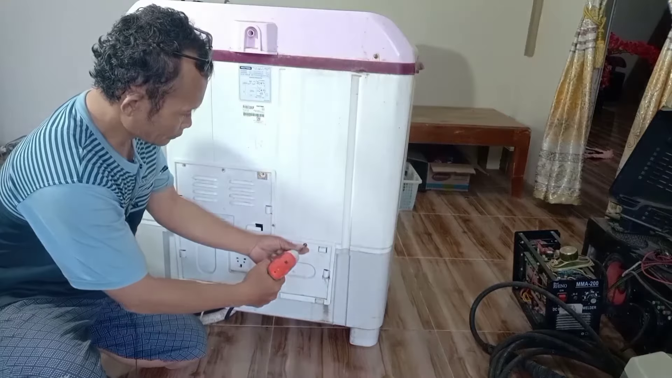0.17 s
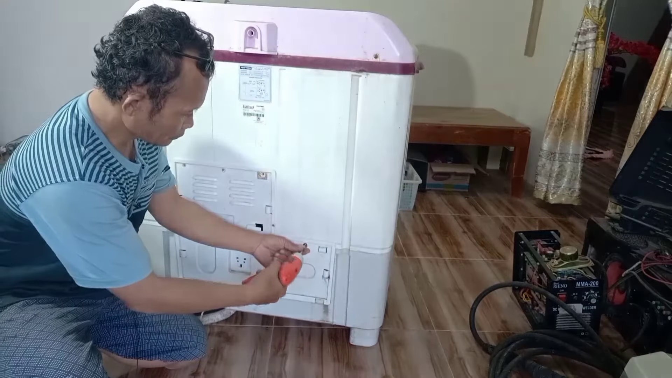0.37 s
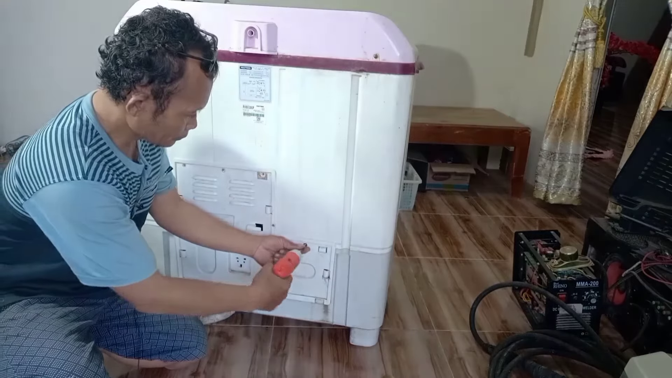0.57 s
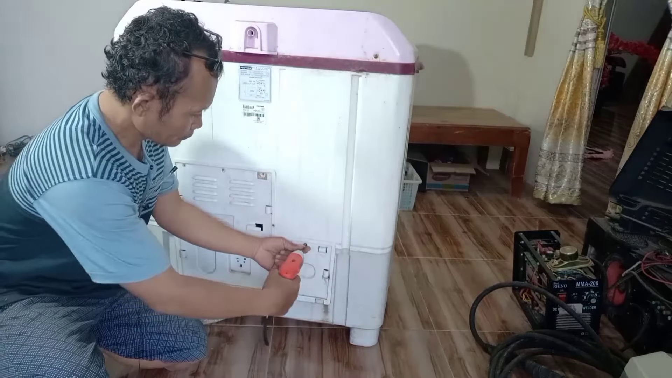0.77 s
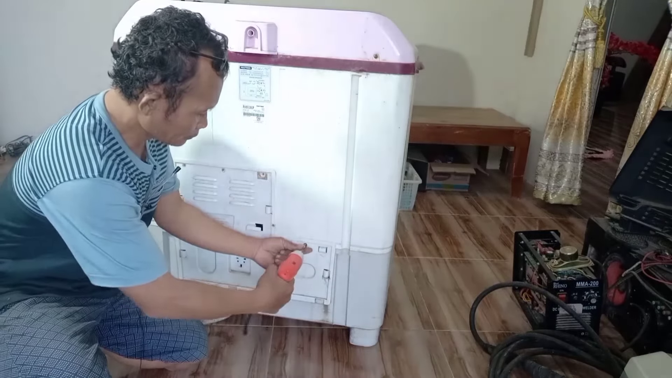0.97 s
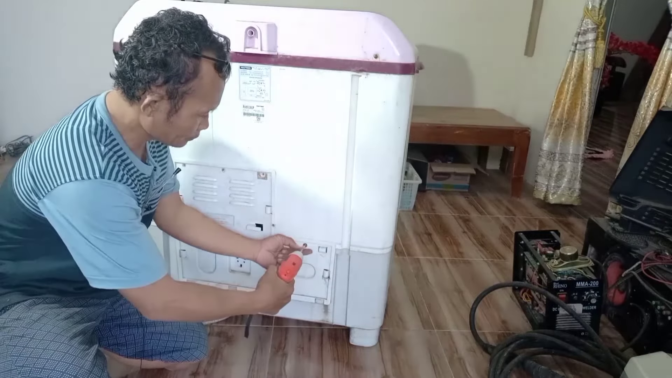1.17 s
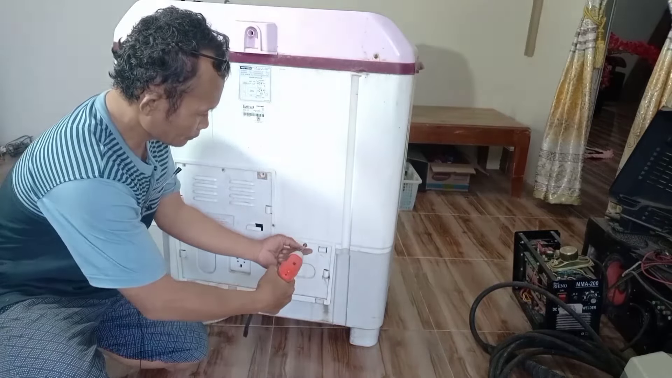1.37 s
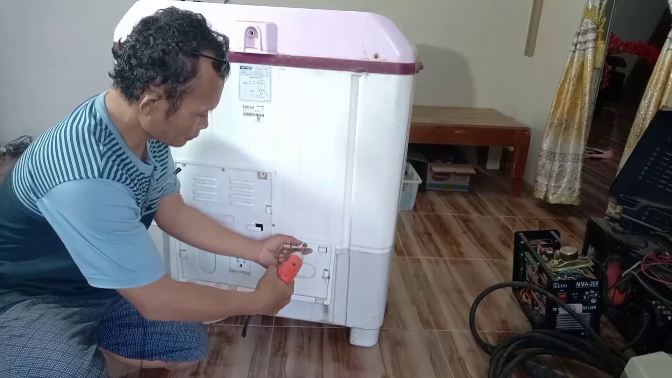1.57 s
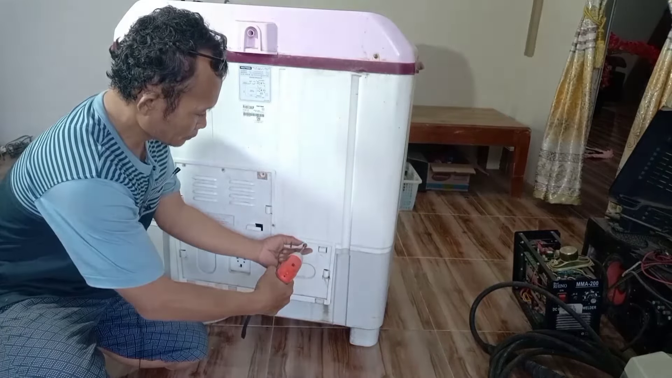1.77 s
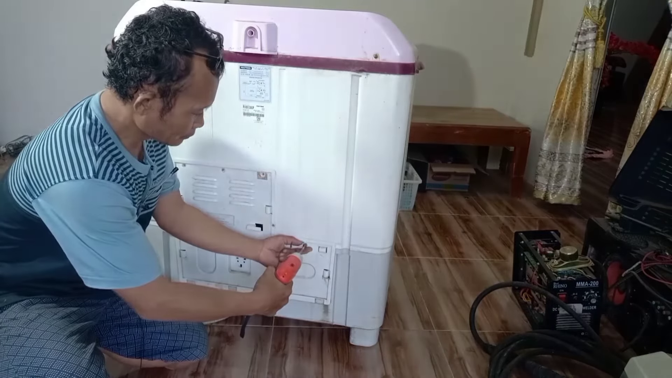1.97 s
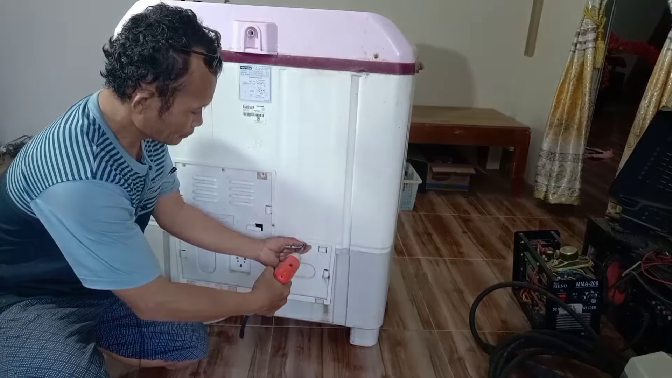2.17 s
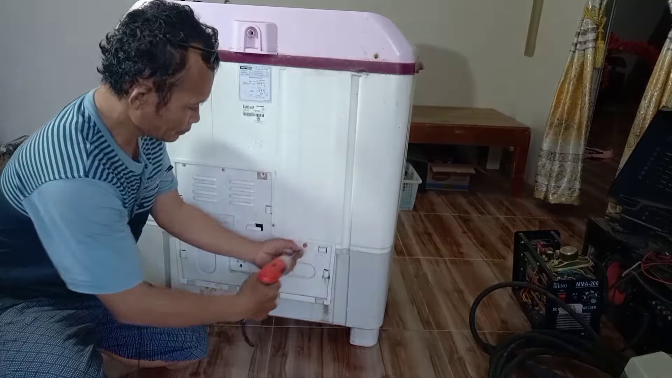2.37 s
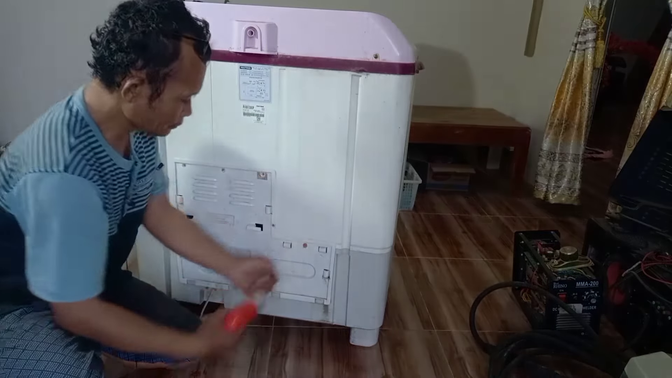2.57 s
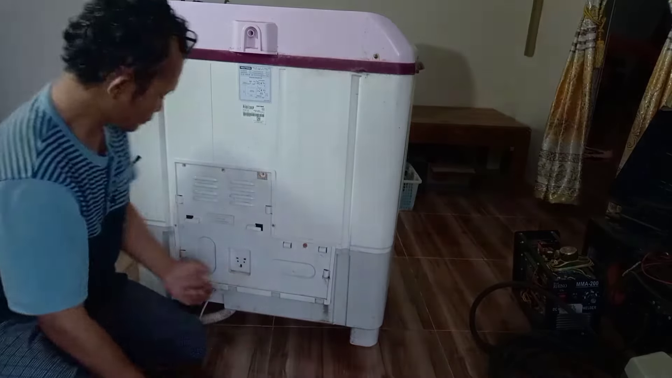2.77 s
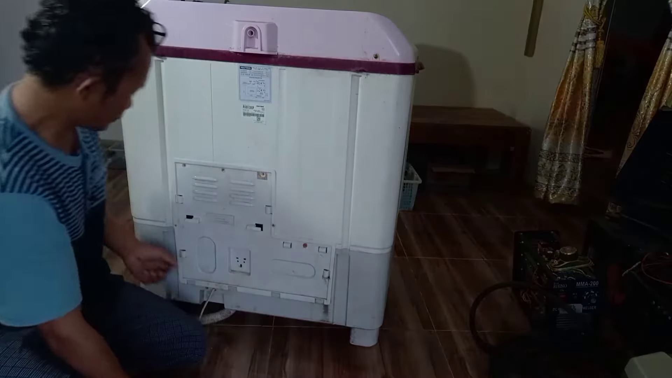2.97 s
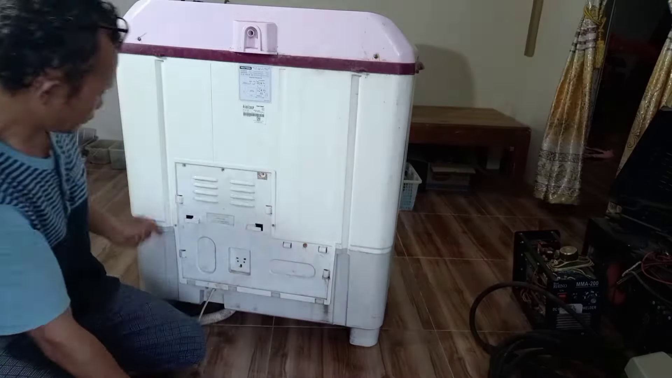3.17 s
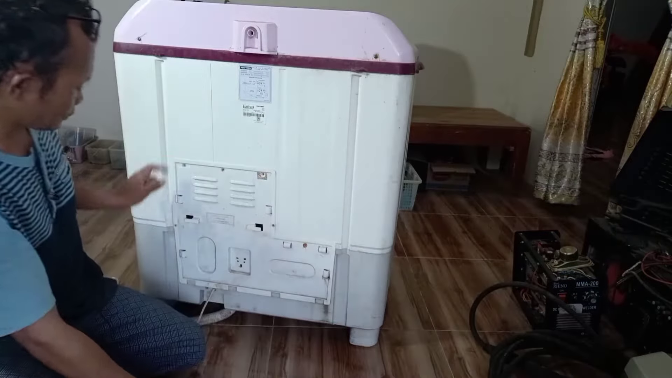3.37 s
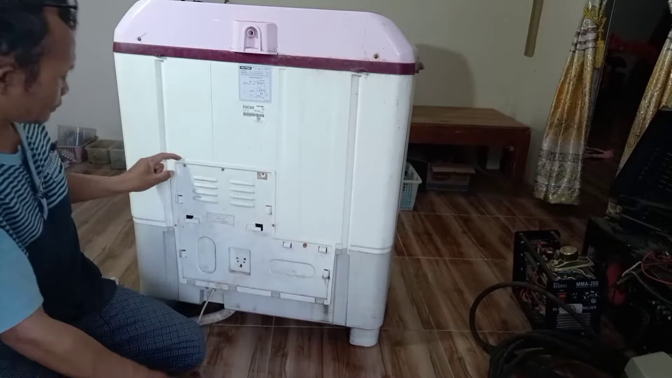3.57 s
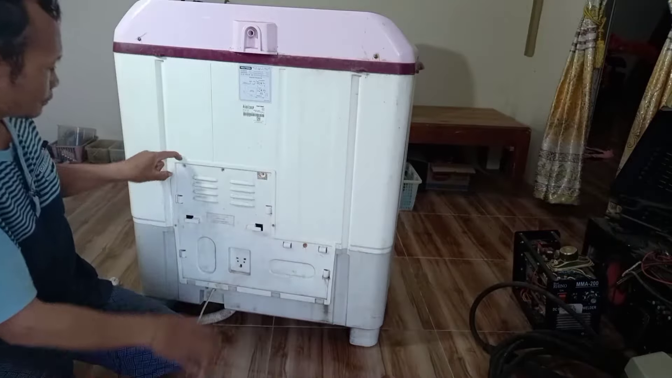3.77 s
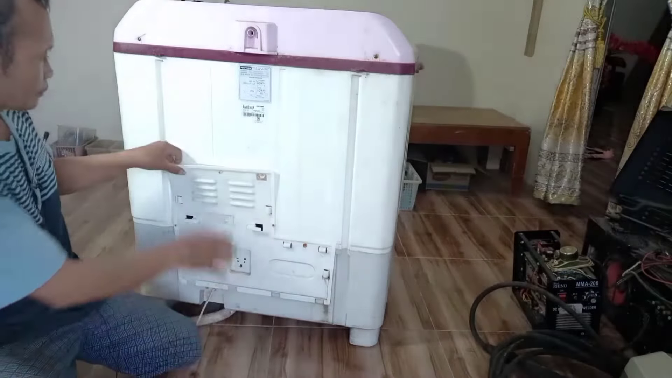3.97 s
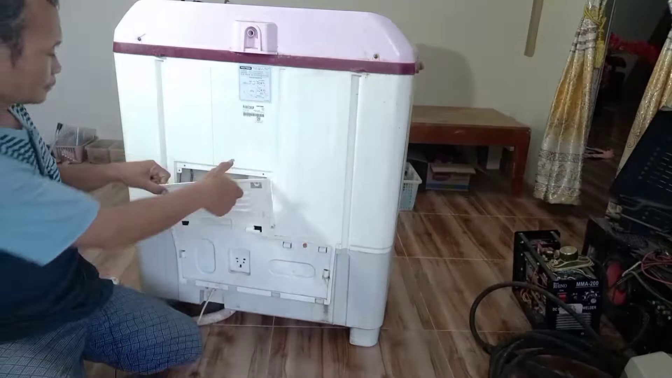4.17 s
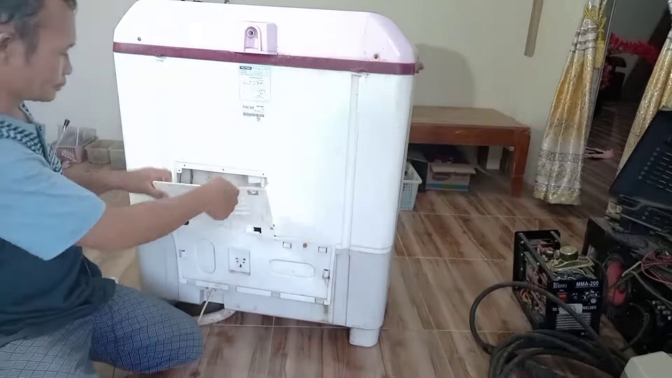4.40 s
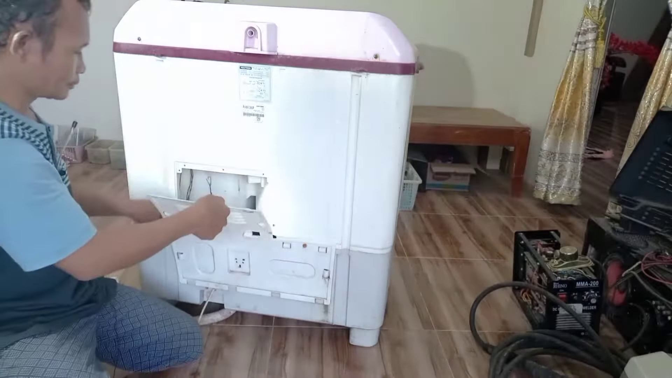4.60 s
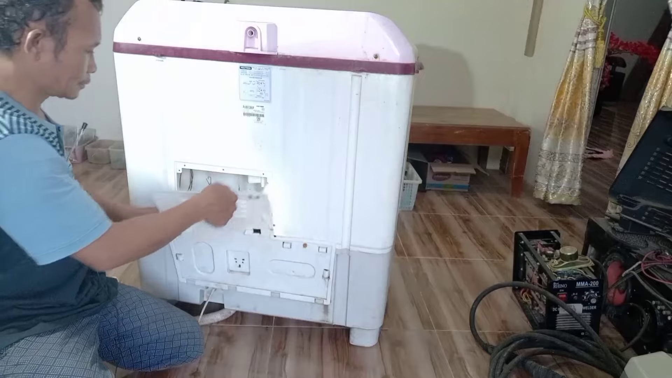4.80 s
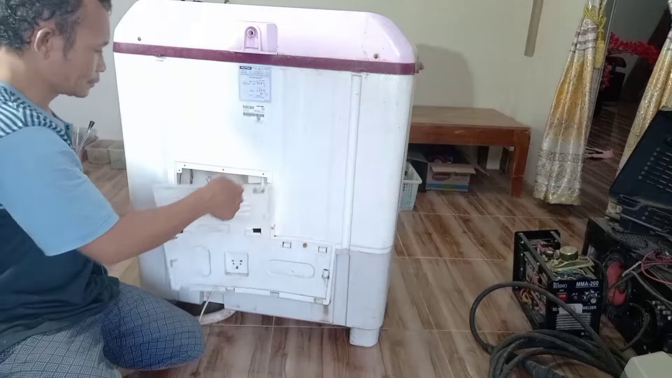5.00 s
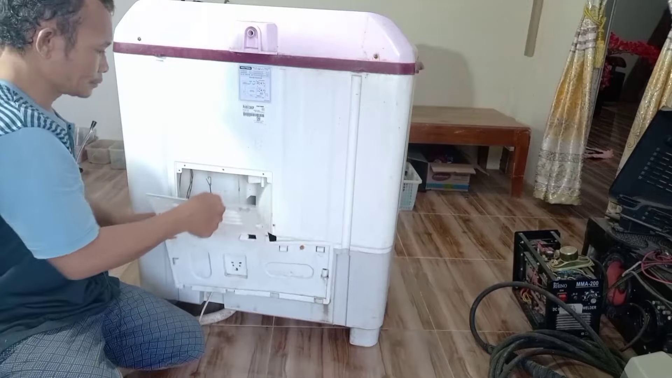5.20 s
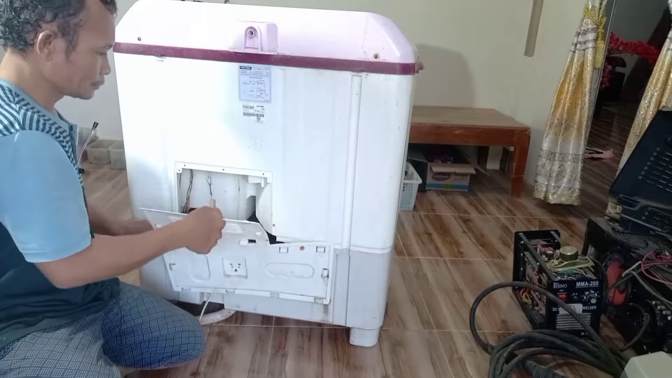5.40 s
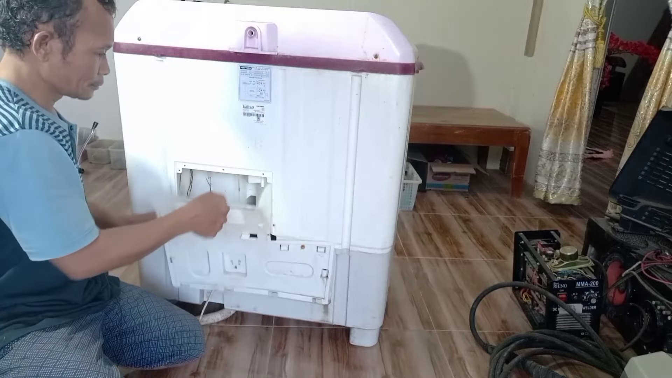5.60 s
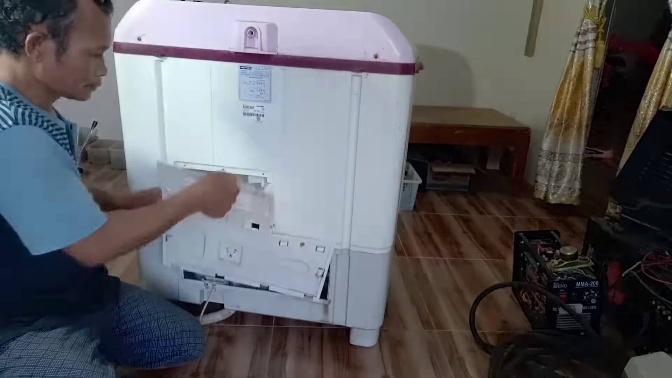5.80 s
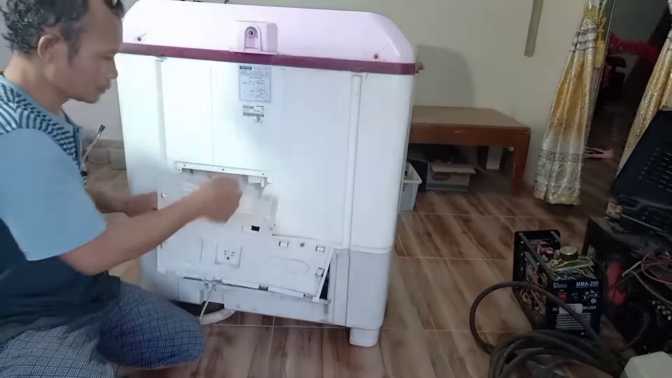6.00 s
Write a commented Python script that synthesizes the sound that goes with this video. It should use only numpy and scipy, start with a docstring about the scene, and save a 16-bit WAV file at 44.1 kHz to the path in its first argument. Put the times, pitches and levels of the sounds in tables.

```python
"""A tiled room, at the back of a washing machine. A small cordless screwdriver spins a screw out:
the rotor hums, the gears whine and rattle, the brushes scratch. It speeds up as the screw frees, then
coasts to a stop. The plastic back panel is pried off: it grinds and squeaks in its slot, its tabs snap
loose and it knocks against the hollow cabinet. Underneath lies a bed of low rumble, a distant motor's
drone, soft hiss and a faint electronic buzz."""
import sys
import numpy as np
from scipy import signal
from scipy.fft import rfft, irfft, next_fast_len
from scipy.io import wavfile
from scipy.ndimage import map_coordinates

SR = 44100
rng = np.random.default_rng(int(sys.argv[2]) if len(sys.argv) > 2 else 0)


def digitize_waveform(pressure):
    """Quantize a signal to 16-bit integers and store it at the path in sys.argv[1].

    Rows of a 2-D input are taken as channels; values are limited to [-1, 1].
    """
    field = np.atleast_2d(pressure).T
    bounded = np.clip(field, -1, 1)
    quanta = np.round(bounded * 32767).astype(np.int16)
    wavfile.write(sys.argv[1], SR, quanta)


N = 266672

# Table levels are relative, set before the mix.
# unbalance of the rotor and planet wheels: multiple of shaft speed, level/dB
UNBALANCE = [(.59, -4.5), (1, -1.5), (1.181, -7.5), (1.8, -14), (2, -14), (2.391, -11.5)]
# three rotor poles and the commutator's thin overtones: multiple of shaft speed, level/dB
POLE_TONES = [(3, 3.5), (4, -11), (22, -18), (40, -4), (41, -5)]
# tooth mesh and its overtones: multiple of shaft speed, level/dB
TOOTH_TONES = [(4.7, -12), (5.375, -3), (5.65, -10), (6.35, -12), (8.35, -9), (9, -10), (10.75, -1),
               (16.125, 0), (18.8, -3), (21.5, -2), (26.875, -2)]
# resonances of the gear housing: f/Hz, width/Hz, level/dB
HOUSING_PEAKS = [(930, 80, -2), (1140, 150, 2), (2150, 330, -2), (2620, 280, -2), (3750, 150, -6),
                 (4120, 240, -7), (4660, 260, -3)]
# colour of the gear rattle: f/Hz, level/dB
RATTLE_EQ = [(59, -53), (100, -16), (152, -15), (201, 1), (290, -11), (410, -10), (724, -4.5), (1010, -8.5),
             (1150, -13.5), (1710, -4.5), (2520, -3), (2970, -8.5), (4620, -9.5), (7040, -9.5),
             (8000, -15.5), (10400, -55), (17600, -120)]
# colour of the brush scratch: f/Hz, level/dB
BRUSH_EQ = [(4800, -31.5), (5400, -5.5), (5800, -25.5), (7500, -12), (8250, -3), (8750, -12.5), (9450, -2),
            (10100, -3.5), (11000, 0), (12600, -5.5), (14000, -13.5), (15500, -22)]
# the panel knocks and its tabs snap: t/s, knock level/dB, clack over knock/dB, snap over knock/dB
PANEL_HITS = [(.54, -30.5, -4.5, -7), (3.332, -44.5, -1.5, 4), (4.103, -22, -16, -13),
              (4.113, -24.5, -20, -13), (4.226, -18, -16, -17.5), (4.308, -16.5, -11.5, -19.5),
              (4.775, -12, -10.5, -17.5), (5.026, -23, -18, -18.5), (5.068, -13, -3, -9.5),
              (5.235, -33, -13, -25), (5.351, -12.5, -2.5, -4), (5.983, -24.5, 2, 6)]
# soft thuds: one right at the start, the rest where hands and tool bump the cabinet: t/s, thud level/dB
SOFT_BUMPS = [(.03, -32), (.552, -27.5), (.764, -37), (3.154, -41.5), (3.373, -33), (3.694, -41.5),
              (5.825, -33.5)]
# the bit and the loose screw click: t/s, snap level/dB
SCREW_CLICKS = [(1.034, -47), (1.068, -43), (2.85, -46.5), (2.926, -28.5), (2.991, -39)]
# ring of the hollow cabinet and its panel: f/Hz, level/dB, t60/s
CABINET_MODES = [(107.5, 3.5, 0.29), (158.2, 3, 0.21), (287, -4.5, 0.15), (378.6, -0.5, 0.2),
                 (480, 2.5, 0.29), (600, -10, 0.17), (711, 5, 0.096), (900.6, 5.5, 0.17),
                 (1260, -2.5, 0.48), (1700, -12, 0.48), (2025, 6.5, 0.21), (2260, 7, 0.17),
                 (2460, -1, 0.33), (3166, 22.5, 0.046), (7370, 1, 0.17)]
# colour of the struck plastic: f/Hz, level/dB
PLASTIC_EQ = [(35, -39), (60, -14), (96, 0), (156, 2), (259, 6), (475, -5.5), (673, -2.5), (773, -8.5),
              (869, -10), (1450, -13), (2470, -11.5), (3270, -22.5), (8280, -28.5), (11200, -24),
              (15500, -38)]
# the panel grinds in its slot just before it gives: t/s, length/s, level/dB
PANEL_GRINDS = [(4.223, 0.0072, -23), (4.286, 0.0293, -24), (4.758, 0.0153, -21.5), (5.327, 0.063, -41)]
# hands and panel slide over the plastic: t/s, length/s, level/dB
SLIDES = [(3.33, 0.22, -59), (4.09, 0.089, -60), (5.002, 0.031, -52), (5.805, .025, -54.5)]
# colour of a slide: f/Hz, level/dB
SLIDE_EQ = [(300, -23), (1500, -1), (5500, -6), (11500, 1), (15000, -12)]
# partials of a distant motor: f/Hz, level/dB
DRONE_TONES = [(82, 0.5), (126, 3), (222, -10.5)]
# swell of that motor's drone: t/s, level/dB
DRONE_RIDE = [(0, -41.5), (.9, -52), (3.15, -55), (3.45, -43), (3.9, -53.5), (4.55, -49), (6.05, -48.5)]
# colour of the room's rumble: f/Hz, level/dB
RUMBLE_EQ = [(15, -48), (25, -18), (49, -17.5), (70, -4.5), (118, -2.5), (188, -7), (227, -2.5),
             (264, -11.5), (356, -15.5), (436, -21), (500, -18), (650, -52), (1100, -120)]
# colour of the room's hiss: f/Hz, level/dB
HISS_EQ = [(180, -37), (300, -1.5), (420, -7.5), (600, -4), (900, -7.5), (1650, -14.5), (2400, -15),
           (3600, -21), (4600, -22.5), (5100, -19.5), (5900, -23), (11500, -21.5), (15500, -25.5)]
# faint electronic buzz: harmonic number, level/dB
BUZZ_TONES = [(2, 8), (3, 8), (4, 7), (5, 4.5), (8, 4), (9, 7.5), (10, 8), (11, 8), (12, -14)]

# tool layers: level running free/dB, boost at full load/dB, boost per doubling of spin/dB
HUM_LAW, POLE_LAW, BRUSH_LAW = (-48.5, 10, 2), (-44, 6, 14), (-35, 8.5, 5.3)
RATTLE_LAW, MESH_LAW = (-41.5, 11.8, 1.5), (-45, 13.5, 2)
ON_S, FREE_S, OFF_S = 1.088, 2.088, 2.465  # trigger pressed, screw free, trigger released
ATTACK_S = .016
TIME = np.arange(N) / SR


def screwdriver(free_hz=307.5, drag_hz=85.5, stop_s=.62, jolt_db=4, jolt_s=.045):
    """One shaft drives rotor, gears and brushes; the pitch climbs as the screw's drag eases."""
    load, spin, coasting_s = motion()
    shaft_hz = (free_hz - drag_hz * load) * spin
    angle = phase(shaft_hz * (1 + .00294 * wobble(40.35)))
    # Backlash lets the gears run less evenly than the rotor.
    gear_angle = angle + phase(shaft_hz * .00645 * wobble(160))
    dull_db = 4 * coasting_s  # per multiple of shaft speed: high overtones die first
    motor = rotor(angle, shaft_hz, load, spin, dull_db)
    gearbox = gears(gear_angle, shaft_hz, load, spin, dull_db)
    scratch = level(BRUSH_LAW, load, spin) * brushes(angle, gear_angle)
    # The slack gears jolt at release; with the current off, gears and brushes fade.
    release = amp(jolt_db * np.exp(-((TIME - OFF_S) / jolt_s) ** 2) - 24 * coasting_s)
    running = gate(ON_S, N / SR, ATTACK_S) * np.clip(1 - (coasting_s / stop_s) ** 2, 0, 1)
    return running * (motor + release * (gearbox + scratch))


def motion(start_lag=.35, spin_up_s=.079, coast_s=.42):
    """The screw's drag eases evenly; the motor spins up, then coasts down after release."""
    load = np.clip((FREE_S - TIME) / (FREE_S - ON_S), 0, 1)
    coasting_s = np.maximum(TIME - OFF_S, 0)
    spin_up = 1 - start_lag * np.exp(-np.maximum(TIME - ON_S, -ATTACK_S) / spin_up_s)
    return load, spin_up * np.exp(-coasting_s / coast_s), coasting_s


def level(law, load, spin):
    """Gain of one tool layer from its load and spin."""
    free_db, load_db, spin_db = law
    return amp(free_db + load_db * load + spin_db * np.log2(spin))


def rotor(angle, shaft_hz, load, spin, dull_db, let_go_s=.36):
    """Unbalance hums; poles and commutator add a whine that brightens as the load eases."""
    hum = unit(sum(amp(db + 2.5 * wobble(45)) * np.sin(k * angle + .2 * wobble(60))
                   for k, db in UNBALANCE))
    whine = sum(amp(db + 1.4 * wobble(40.6) - k * (dull_db + .5 * load)) * np.sin(k * angle)
                for k, db in POLE_TONES)
    # The cabinet amplifies the hum while the screw grips, and rings as the shaft passes its resonance.
    grip = np.clip((FREE_S - TIME) / let_go_s + .78, 0, 1)
    ring_db = 3.5 * resonance(shaft_hz, centre_hz=288, width_hz=30)
    return level(HUM_LAW, grip, spin) * amp(ring_db) * hum + level(POLE_LAW, load, spin) * whine


def gears(angle, shaft_hz, load, spin, dull_db):
    """Meshing teeth whine and rattle through the housing, louder under load."""
    mesh = sum(amp(db + 4 * wobble(70) - k * dull_db) * housing(k * shaft_hz)
               * np.sin(k * angle + .7 * wobble(130)) for k, db in TOOTH_TONES)
    chatter = grains(depth_db=2.5, rate=300)
    rattle = shaped(coloured(chatter, lambda hz: 1 + .5 * housing(hz)), RATTLE_EQ)
    return level(RATTLE_LAW, load, spin) * rattle + level(MESH_LAW, load, spin) * mesh


def housing(hz):
    """Gain of the gear housing, which rings as a tone sweeps through its peaks."""
    return amp(-14.5) + sum(amp(db) * resonance(hz, peak, width) for peak, width, db in HOUSING_PEAKS)


def brushes(angle, gear_angle):
    """A sparky scratch pulses with each rotor turn and with the slower planet wheels."""
    pulsing = (1 + .12 * np.cos(angle)) * (1 + .33 * np.cos(.34 * gear_angle))
    sparks = amp(3 * wobble(700) + 1.27 * wobble(60))
    return shaped(rng.standard_normal(N) * pulsing * sparks, BRUSH_EQ)


def knocks():
    """Panel hits, soft bumps and small clicks all sound through the same cabinet."""
    out = np.zeros(N)
    for s, db, clack_db, snap_db in PANEL_HITS:
        thud_db = -25.5 + .58 * (db + 18.5)  # varies less than the knock, so hard hits are less boomy
        add(out, s, strike(thud_db, db, db + clack_db, db + snap_db))
    for s, db in SOFT_BUMPS:
        add(out, s, amp(db) * strike(thud_db=0, knock_db=-5.5, clack_db=-14, snap_db=-20))
    for s, db in SCREW_CLICKS:
        add(out, s, amp(db) * strike(thud_db=-24, knock_db=-5, clack_db=-3.5, snap_db=0))
    return out


def strike(thud_db, knock_db, clack_db, snap_db):
    """One hit in four layers: the cabinet's thud and knock, the panel's clack, the snap of its edge."""
    ring = amp(-6) * cabinet_ring()
    # A hard snap has a faster attack and sits higher than a soft bump.
    sharp_db = snap_db - knock_db
    rise_s = min(.00025 * amp(-sharp_db), .0025)
    edge_hz = np.clip(4398 + 150 * sharp_db, 3000, 6500)
    top_hz = np.clip(16000 + 200 * sharp_db, 6000, 18000)
    thud = hit_layer(ring, rise_s, 56, 427, contact=.16, t60=.14, room_db=-11, room_t60=1)
    knock = hit_layer(ring, rise_s, 334, 1300, contact=.95, t60=.07, room_db=-.5, room_t60=.4)
    clack = hit_layer(ring, rise_s, 980, 4650, contact=.93, t60=.028, room_db=-2.5, room_t60=.55)
    snap = hit_layer(ring, rise_s, edge_hz, top_hz, contact=.75, t60=.031, room_db=-5.5, room_t60=.37)
    return (amp(thud_db + 27.5) * thud + amp(knock_db + 21.5) * knock
            + amp(clack_db + 22) * clack + amp(snap_db + 22.5) * snap)


def hit_layer(ring, rise_s, lo_hz, hi_hz, contact, t60, room_db, room_t60):
    """Contact transient, modes, dense plastic clatter and room tail in one band; energy 1."""
    x = ring + noise_tail(t60) + amp(room_db) * noise_tail(room_t60)
    x *= 1 - np.exp(-TIME[:SR] / rise_s)
    x[round(rise_s * SR)] += contact
    x = coloured(x, lambda hz: panel_gain(hz, lo_hz, hi_hz))
    return x / np.linalg.norm(x)


def panel_gain(hz, lo_hz, hi_hz):
    """One band of the plastic's response."""
    band = 1 / np.sqrt((1 + (lo_hz / (hz + 1)) ** 8) * (1 + (hz / hi_hz) ** 8))
    return eq_gain(PLASTIC_EQ, hz) * band


def cabinet_ring(scatter_db=4.5):
    """The hollow cabinet's modes, in a fresh balance for every hit; energy 1."""
    t = TIME[:SR]
    x = sum(amp(db + scatter_db * rng.standard_normal() - 60 * t / t60) * np.sin(2 * np.pi * hz * t)
            for hz, db, t60 in CABINET_MODES)
    return x / np.linalg.norm(x)


def grinding():
    """Quick uneven slips shake the panel and the cabinet's modes."""
    ring = amp(-9) * cabinet_ring()
    body = hit_layer(ring, .001, 220, 1300, contact=1, t60=.03, room_db=-5, room_t60=.3)
    strokes = sum(amp(db) * gate(s, length, .004) for s, length, db in PANEL_GRINDS)
    slips = strokes * unit(grains(depth_db=3, rate=400))
    return signal.fftconvolve(slips, body)[:N]


def rubbing(rise_db_per_s=450, fall_db_per_s=105):
    """Skin and plastic slide with a faint grainy swish."""
    strokes = sum(amp(db - rise_db_per_s * np.maximum(s - TIME, 0)
                      - fall_db_per_s * np.maximum(TIME - s - length, 0)) for s, length, db in SLIDES)
    return strokes * shaped(grains(depth_db=3, rate=250), SLIDE_EQ)


def squeak(pitch_hz=11900):
    """The plastic edge slides in its slot with a thin wavering whistle."""
    hz = pitch_hz * (1 + .024 * wobble(20) + .0096 * wobble(500))
    return amp(-59.5) * gate(start_s=4.1, length_s=.23, edge_s=.018) * unit(np.sin(phase(hz)))


def tiled_room(x, wet_db=-6, t60=.33):
    """The direct sound plus a short tail off the tiles."""
    return x + amp(wet_db) * signal.fftconvolve(x, noise_tail(t60))[:N]


def room_tone(drift=.021, follow=.18):
    """A distant motor's wandering drone; rumble and smooth hiss swell a little with it."""
    drone_db = np.interp(TIME, *np.transpose(DRONE_RIDE))
    swell_db = follow * (drone_db - drone_db.mean())
    rumble = amp(-49.5 + swell_db) * shaped(rng.standard_normal(N), RUMBLE_EQ)
    turn = phase(1 + drift * wobble(5))
    drone = unit(sum(amp(db + 2 * wobble(10)) * np.sin(hz * turn) for hz, db in DRONE_TONES))
    hiss = amp(-54.5 + swell_db) * shaped(rng.standard_normal(N), HISS_EQ)
    return rumble + amp(drone_db) * drone + hiss


def buzz(pitch_hz=1107, burst_hz=30):
    """Electronics buzz faintly in short, slightly uneven bursts."""
    cycle = burst_hz * TIME + .25 * wobble(11)
    bursts = np.clip(2 * np.cos(2 * np.pi * cycle), 0, 1)
    tone = sum(amp(db) * np.sin(2 * np.pi * k * pitch_hz * TIME + wobble(30)) for k, db in BUZZ_TONES)
    return amp(-63.5) * unit(bursts * tone)


def amp(db):
    """Decibels to gain."""
    return 10 ** (np.asarray(db) / 20)


def unit(x):
    """Scaled to rms 1."""
    return x / np.sqrt(np.mean(x ** 2) + 1e-20)


def phase(hz):
    """Running angle of a gliding pitch."""
    return 2 * np.pi * np.cumsum(hz) / SR


def resonance(hz, centre_hz, width_hz):
    """A bell curve of height 1."""
    return 1 / (1 + (2 * (hz - centre_hz) / width_hz) ** 2)


def wobble(rate):
    """A smooth random curve, rate knots a second."""
    return map_coordinates(rng.standard_normal(int(N * rate / SR) + 4), [np.arange(N) * rate / SR])


def grains(depth_db, rate):
    """Noise roughened by a flickering level."""
    return rng.standard_normal(N) * amp(depth_db * wobble(rate))


def noise_tail(t60):
    """A decaying burst of noise; energy 1."""
    burst = rng.standard_normal(SR) * amp(-60 * TIME[:SR] / t60)
    return burst / np.linalg.norm(burst)


def gate(start_s, length_s, edge_s):
    """1 while a sound lasts, with straight fades."""
    return np.clip(np.minimum(TIME - start_s, start_s + length_s - TIME) / edge_s + .5, 0, 1)


def eq_gain(eq, hz):
    """Gain of an EQ curve, read on a log frequency axis."""
    f, db = np.transpose(eq)
    return amp(np.interp(np.log(hz + 1), np.log(f + 1), db))


def coloured(x, gain):
    """x through the minimum-phase filter with response gain(hz)."""
    m = 2 * next_fast_len(len(x))
    cepstrum = irfft(np.log(np.maximum(gain(np.fft.rfftfreq(m, 1 / SR)), 1e-6)))
    cepstrum[1:m // 2] *= 2
    cepstrum[m // 2 + 1:] = 0
    return irfft(rfft(x, m) * np.exp(rfft(cepstrum)))[:len(x)]


def shaped(x, eq):
    """x through an EQ curve, at rms 1."""
    return unit(coloured(x, lambda hz: eq_gain(eq, hz)))


def add(out, s, sound):
    """Mix a sound in at s seconds."""
    part = out[round(s * SR):][:len(sound)]
    part += sound[:len(part)]


def scene():
    """Tool and panel over the room's bed, in mono."""
    tool = amp(-1.2) * tiled_room(screwdriver())
    panel = knocks() + grinding() + rubbing() + squeak()
    return (tool + panel + room_tone() + buzz())[None]


def record(dry, top_hz=15600):
    """A brick-wall high cut on the mix."""
    m = next_fast_len(N + SR)
    return irfft(rfft(dry, m) * (np.fft.rfftfreq(m, 1 / SR) < top_hz), m)[..., :N]


dry = scene()
out = record(dry)
digitize_waveform(out)
```